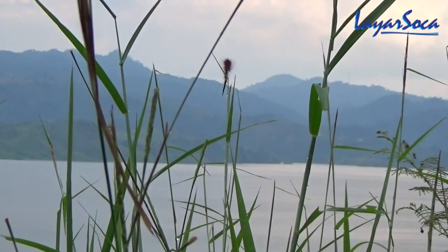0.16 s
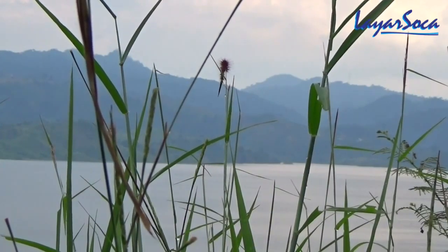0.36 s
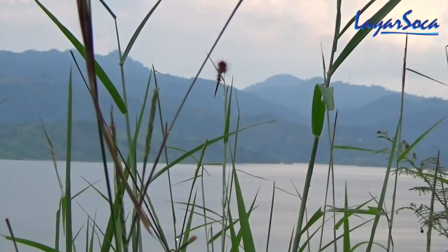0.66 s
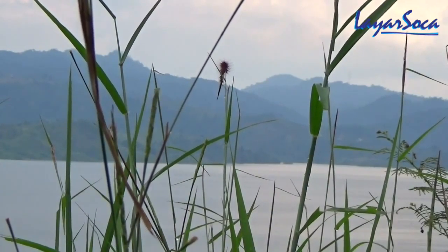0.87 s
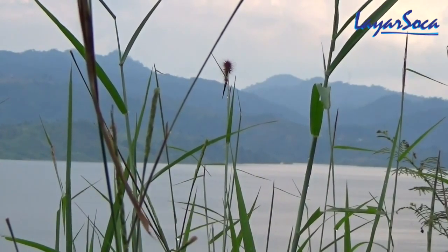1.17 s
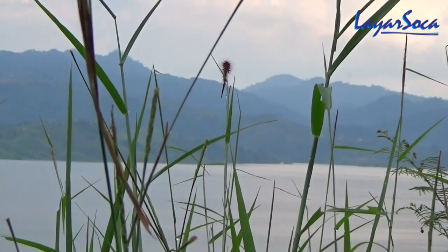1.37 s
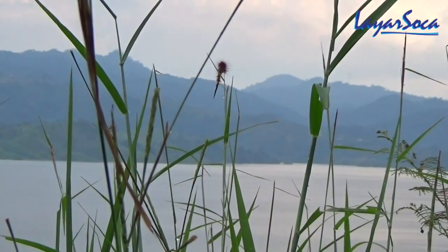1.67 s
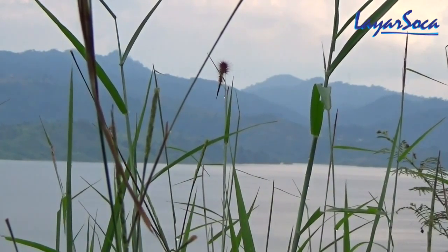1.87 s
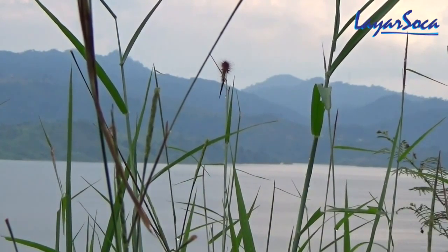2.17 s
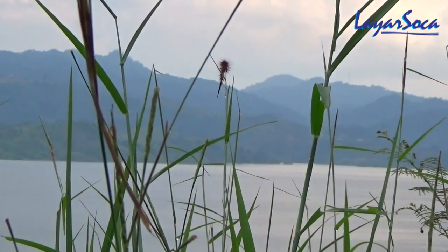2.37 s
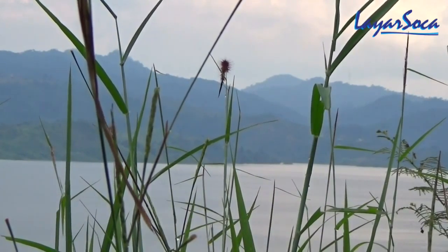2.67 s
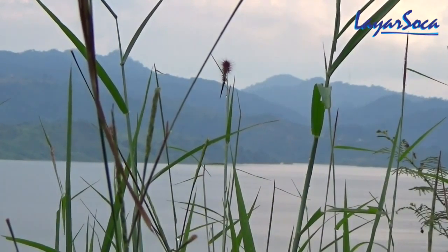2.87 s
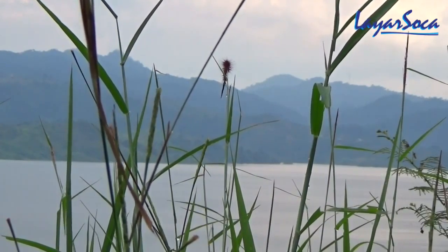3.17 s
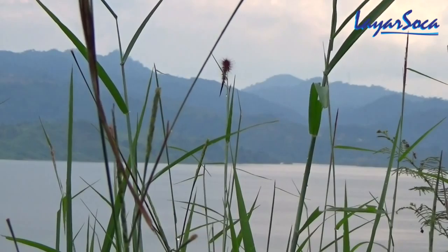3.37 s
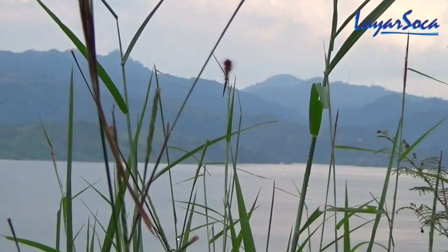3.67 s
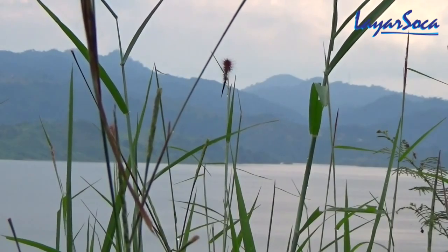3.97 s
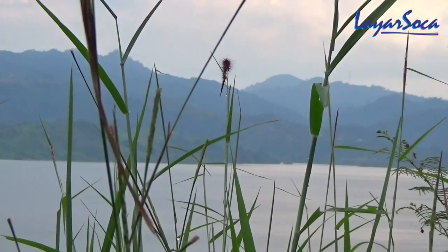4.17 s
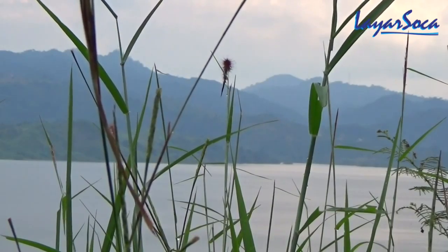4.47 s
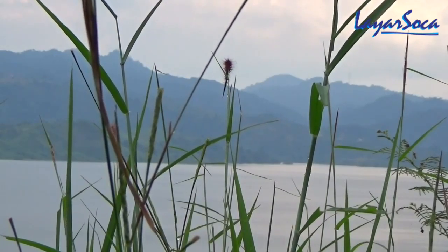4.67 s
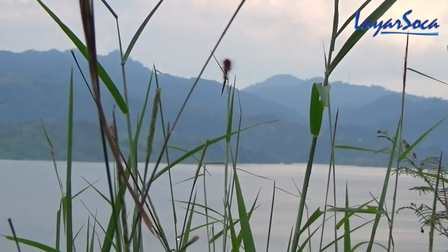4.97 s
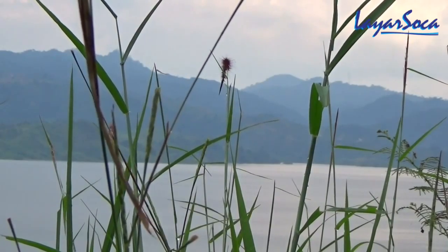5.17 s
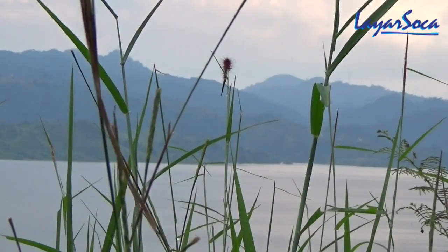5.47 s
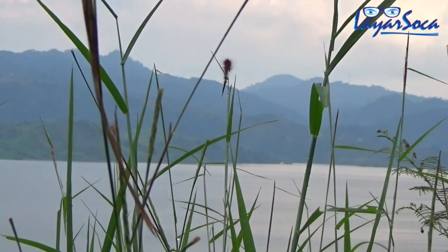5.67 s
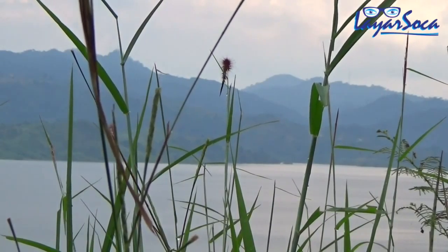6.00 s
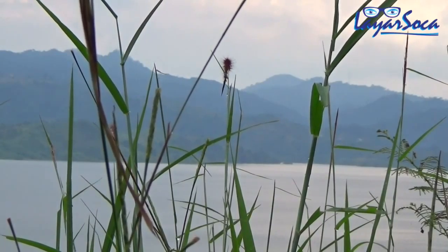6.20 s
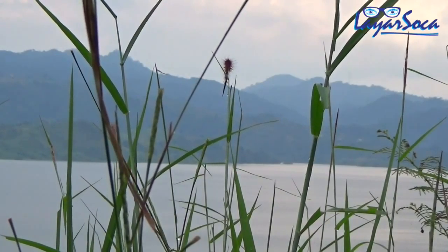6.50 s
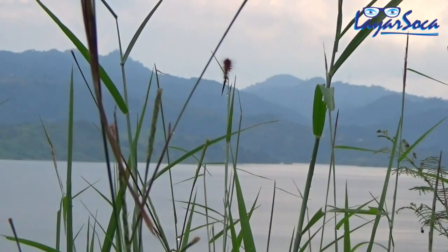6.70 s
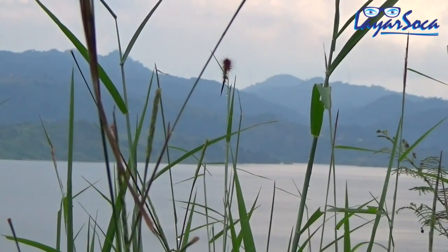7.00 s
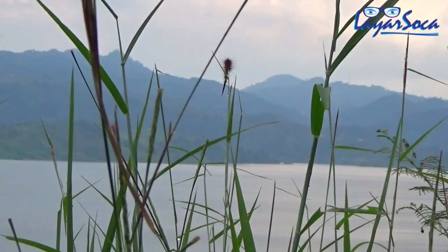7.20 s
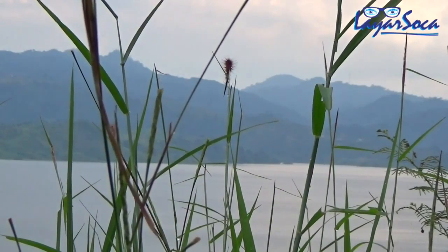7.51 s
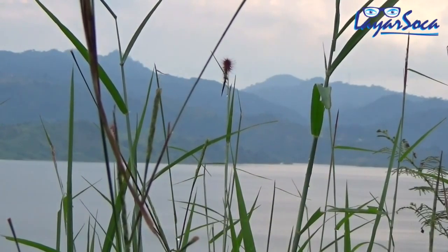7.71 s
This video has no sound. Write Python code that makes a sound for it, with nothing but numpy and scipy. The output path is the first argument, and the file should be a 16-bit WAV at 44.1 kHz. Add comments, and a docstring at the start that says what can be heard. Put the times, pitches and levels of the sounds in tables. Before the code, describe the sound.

Outdoors among lakeside reeds, a close cricket, slightly left, sings short runs of two to six very high, ringing pulses with brief rests. Fainter crickets answer continuously, lower trills and dry rasps throb behind, and distant insects blur into a high hiss. Small birds peep early and whistle downward later. A low distant engine wavers under soft open air. Stereo microphone, quiet and natural.

```python
"""A near cricket sings runs of short, high syllables: a gliding tone that sags as the wings stop, plus its octave.
Farther ones answer, echoing more, and thin bird calls come as short sliding whistles among the reeds.
Trills are pulsed tones and throbbing noise bands; rasps are swelling noise bands; far singers blur into noise.
Underneath: an open-air wash of shaped noise, a distant engine's two wavering sines, breeze puffs, reed ticks."""
import sys
import numpy as np
from scipy import signal
from scipy.fft import rfft, irfft, next_fast_len
from scipy.io import wavfile
from scipy.ndimage import uniform_filter1d

SR = 44100
rng = np.random.default_rng(int(sys.argv[2]) if len(sys.argv) > 2 else 0)


def int16_out(signal):
    """Quantize to a 16-bit WAV file."""
    q = np.round(np.clip(np.atleast_2d(signal).T, -1, 1) * 32767)
    wavfile.write(sys.argv[1], SR, q.astype(np.int16))


N = 346185
TIME_S = np.arange(N) / SR


def amp(db):
    """Decibels to gain."""
    return 10 ** (np.asarray(db) / 20)


def unit(x):
    """Scales to rms 1."""
    return x / np.sqrt(np.mean(x ** 2) + 1e-20)


def read(points, hz):
    """Interpolates a table on a log-frequency axis."""
    f_hz, value = np.transpose(points)
    return np.interp(np.log(hz + 1), np.log(f_hz + 1), value)


def add(mix, start_s, sound):
    """Mixes a sound in at start_s, cut to the ends."""
    start = int(round(start_s * SR))
    sound = sound[max(-start, 0):]
    part = mix[max(start, 0):][:len(sound)]
    part += sound[:len(part)]


def drift(rate_hz):
    """Random wander of rms 1, no faster than about rate_hz; holds its last value if the knots run out."""
    knots = rng.standard_normal(4096)
    return unit(np.interp(TIME_S * 2 * rate_hz, np.arange(len(knots)), knots))


def band(hz, width_hz):
    """Noise in one bell-shaped band, rms 1, partly different at each ear."""
    size = next_fast_len(N)
    f_hz = np.fft.rfftfreq(size, 1 / SR)
    noise = rng.standard_normal((3, size))
    ears = noise[:2] + 1.3 * noise[2]
    bell = 1 / (1 + (2 * (f_hz - hz) / width_hz) ** 4)
    return unit(irfft(rfft(ears) * bell, size)[:, :N])


def pan(x, side_db):
    """Places a sound by its left-minus-right level."""
    return x * amp([[side_db / 2], [-side_db / 2]])


def scatter(x, wet_db, t60_s):
    """Stems and leaves return a short spray of echoes, partly different at each ear."""
    t = np.arange(SR // 3) / SR
    taps = rng.standard_normal((3, len(t))) * amp(-60 * t / t60_s) * (t > .002)
    taps = taps[:2] + taps[2]
    taps *= amp(wet_db) / np.linalg.norm(taps[0])
    taps[:, 0] = 1  # direct sound
    wet = signal.oaconvolve(x[None], taps, axes=1)[:, :N]
    return wet / np.sqrt(1 + amp(wet_db) ** 2)


def swells(rows):
    """Gain curve of bell-shaped swells from rows (middle/s, length/s, level/dB)."""
    t = TIME_S[::64]
    power = 0
    for middle_s, length_s, db in rows:
        fall = np.minimum(2 * (2 * (t - middle_s) / length_s) ** 2, 100)
        power = power + amp(db) ** 2 * np.exp(-fall)
    return np.interp(TIME_S, t, np.sqrt(power))


def bouts(rows):
    """Gain curve that switches softly on and off from rows (start/s, end/s, level/dB)."""
    gain = 0
    for on_s, off_s, db in rows:
        corners_s = [on_s - .04, on_s + .06, off_s - .02, off_s + .02]
        gain = gain + amp(db) * np.interp(TIME_S, corners_s, [0, 1, 1, 0])
    return gain


# one closing stroke: builds, holds, is damped
STROKE_ATTACK_S, STROKE_HOLD_S, DAMPING_DB_PER_S = 0.02093, .011, 3000
# pitch climbs to WING_HZ at TOP_S, then sags ever faster
WING_HZ, TOP_S, CLIMB_HZ_PER_S, SAG_HZ = 7533, .016, 3160, 152
# brief dip in level and pitch late in the stroke
BREAK_S, BREAK_WIDTH_S, BREAK_DB, BREAK_HZ = 0.0295, 0.0011, -17, 227
OCTAVE_S, OCTAVE_WIDTH_S = .0185, 0.0086


def syllable(shift_hz, wobble_hz, overtone_db):
    """The scraper runs along the file and the wing rings; its octave sounds only at the height of the stroke."""
    t = np.arange(SR // 20) / SR
    stop_s = STROKE_ATTACK_S + STROKE_HOLD_S
    knots = rng.standard_normal(size=(2, 16))
    wobble, grip_db = (np.interp(t, np.linspace(0, t[-1], len(row)), row) for row in knots)

    dip = np.exp(-((t - BREAK_S) / BREAK_WIDTH_S) ** 2)
    sag = np.clip((t - TOP_S) / (stop_s - TOP_S), 0, 1.15) ** 3
    hz = WING_HZ + shift_hz - CLIMB_HZ_PER_S * np.maximum(TOP_S - t, 0)
    hz = hz - SAG_HZ * sag - BREAK_HZ * dip + wobble_hz * wobble
    phase = 2 * np.pi * (np.cumsum(hz) / SR + rng.random())

    damping_db = DAMPING_DB_PER_S * np.maximum(t - stop_s, 0)
    level = np.minimum(t / STROKE_ATTACK_S, 1) * amp(grip_db + BREAK_DB * dip - damping_db)
    height = np.exp(-((t - OCTAVE_S) / OCTAVE_WIDTH_S) ** 2)
    ring = np.sqrt(2) * level * np.sin(phase)
    octave = np.sqrt(2) * amp(overtone_db) * height * np.sin(2 * phase)
    return ring, octave


SYLLABLE_GAP_S, FIRST_BEAT_S, RUN_SWELL_DB = .059626, -.001, 0.6
# near cricket's runs, starts snapped to the beat: (t/s, syllables, mid-run level/dB)
CRICKET_RUNS = [(0, 4, -35.5), (.3, 3, -36), (.66, 5, -36.5), (1.01, 4, -34), (1.49, 6, -34.5),
                (1.97, 6, -33.5), (2.56, 4, -35), (2.86, 2, -35.5), (3.04, 4, -36.5), (3.46, 4, -36),
                (3.76, 3, -36), (3.99, 3, -34.5), (4.35, 5, -36), (4.77, 5, -36), (5.13, 4, -34),
                (5.49, 6, -35), (6.02, 5, -35), (6.38, 2, -35.5), (6.56, 4, -35.5), (6.98, 5, -35.5),
                (7.33, 5, -36), (7.75, 2, -36)]


def near_cricket():
    """Wing strokes on a steady beat that carries on through the rests, growing a little through each run."""
    tone, octave = np.zeros((2, N))
    for start_s, syllables, db in CRICKET_RUNS:
        first_beat = round(start_s / SYLLABLE_GAP_S)
        for k, place in enumerate(np.linspace(-.5, .5, round(syllables))):
            ring, overtone = syllable(rng.normal(0, 4), wobble_hz=10, overtone_db=-23.8)
            beat_s = FIRST_BEAT_S + (first_beat + k) * SYLLABLE_GAP_S
            gain = amp(db + RUN_SWELL_DB * place)
            add(tone, beat_s, gain * ring)
            add(octave, beat_s, gain * overtone)
    tone = scatter(tone, wet_db=-14, t60_s=0.17)
    octave = scatter(octave, wet_db=-14, t60_s=.08)
    return pan(tone, side_db=5.5) + pan(octave, side_db=-3)


# farther crickets of the same kind: (pitch shift/Hz, mean level/dB, syllable gap/s, left minus right/dB)
FAR_CRICKETS = [(-90, -44, .0585, 3), (140, -49, .062, -1), (-110, -51, .064, 2), (125, -52, .057, 1)]


def neighbours():
    """Far wings, ring only: each repeats syllables at its own pace and skips one now and then."""
    out = np.zeros((2, N))
    for shift_hz, db, gap_s, side_db in FAR_CRICKETS:
        song, offset = np.zeros(N), rng.random()
        for k, (skip, late, loud, sharp) in enumerate(rng.random((150, 4)) - .5):
            ring, _ = syllable(shift_hz + 40 * sharp, wobble_hz=20, overtone_db=-30)
            gain = (skip > -.32) * amp(db + 4 * loud)
            add(song, (k - offset + .12 * late) * gap_s, gain * ring)
        out += pan(scatter(song, wet_db=-6, t60_s=.15), side_db)
    return out


def whistle(length_s, start_hz, end_hz, db, arch_hz=0):
    """A thin, slightly hoarse note that slides fast at first and levels off, or arches."""
    u = np.linspace(0, 1, max(int(length_s * SR), 2))
    hoarse_hz = 50 * np.interp(u, np.linspace(0, 1, 24), rng.standard_normal(24))
    slide_hz = end_hz + (start_hz - end_hz) * (1 - u) ** 2.6
    hz = slide_hz + arch_hz * np.sin(np.pi * u) + hoarse_hz
    tone = np.sin(2 * np.pi * np.cumsum(hz) / SR)
    return amp(db) * np.sqrt(2) * signal.windows.tukey(len(u), .5) * tone


FIRST_PEEP_S, PEEP_GAP_S, PEEP_COUNT = 0, .338, 7
PEEP_S, PEEP_START_HZ, PEEP_END_HZ, PEEP_DB = 0.028, 6900, 6800, -52
SLIDE_S = 0.043
# sliding bird notes: (t/s, start f/Hz, end f/Hz, level/dB)
SLIDES = [(.336, 5900, 5250, -59), (4.635, 5300, 6000, -59), (5.504, 5200, 3970, -55),
          (5.911, 6000, 3900, -49.5), (6.428, 6000, 5250, -57), (6.519, 4950, 4520, -62),
          (6.57, 4400, 3980, -65), (7.542, 5700, 3950, -56), (7.58, 6450, 6700, -55)]
LOW_NOTE_S, LOW_NOTE_HZ, LOW_ARCH_HZ, LOW_NOTE_DB = 0.0417, 2133, 618, -59
# low arched bird notes: start t/s
LOW_NOTE_STARTS = [5.594, 5.999]


def birds():
    """Whistled regular peeps, scattered slides and low arched notes, all echoing among the reeds."""
    song = np.zeros(N)
    for k in range(PEEP_COUNT):
        peep = whistle(PEEP_S, PEEP_START_HZ, PEEP_END_HZ, PEEP_DB)
        add(song, FIRST_PEEP_S + k * PEEP_GAP_S, peep)
    for start_s, start_hz, end_hz, db in SLIDES:
        add(song, start_s, whistle(SLIDE_S, start_hz, end_hz, db))
    for start_s in LOW_NOTE_STARTS:
        add(song, start_s, whistle(LOW_NOTE_S, LOW_NOTE_HZ, LOW_NOTE_HZ, LOW_NOTE_DB, LOW_ARCH_HZ))
    return scatter(song, wet_db=-2, t60_s=.2)


def trill(level, hz, sweep_hz, rate_hz, duty, rough_hz):
    """An unbroken train of wing strokes, each falling in pitch; uneven teeth roughen the tone."""
    turns = np.cumsum(rate_hz * (1 + .02 * drift(3))) / SR
    stroke = np.minimum(turns % 1 / np.clip(duty, .1, 1), 1)
    pitch_hz = hz + sweep_hz * (.5 - stroke) + rough_hz * drift(300)
    tone = np.sin(2 * np.pi * np.cumsum(pitch_hz) / SR)
    song = unit(np.sin(np.pi * stroke) * tone * amp(1.5 * drift(40)))
    return scatter(song * level, wet_db=-6, t60_s=.07)


# low trill's level course, before the mix trim: (t/s, level/dB)
LOW_TRILL_LEVEL = [(0.05, -66), (0.39, -63.5), (0.74, -58), (1.1, -63.5), (2.44, -60), (3.0, -72),
                   (3.71, -60), (4.96, -59.5), (5.24, -64.5), (6.27, -60), (6.55, -49), (6.74, -63),
                   (7.78, -60.5)]


def low_trills(trim_db=-4.0):
    """Two low crickets trill side by side in a noise-band haze of farther ones."""
    level = amp(np.interp(TIME_S, *np.transpose(LOW_TRILL_LEVEL)))
    steadier = np.sqrt(level * level.mean())  # half the swing in dB
    quick = trill(level, hz=3530, sweep_hz=580, rate_hz=23.6, duty=.7, rough_hz=65)
    slow = trill(steadier, hz=3490, sweep_hz=500, rate_hz=18, duty=.7, rough_hz=90)
    haze = steadier * band(hz=3545, width_hz=490)
    return pan(amp(trim_db) * (quick + amp(-2.5) * slow + haze), side_db=6.5)


# long rasps: each gap a little longer than the last
FIRST_RASP_S, RASP_GAP_S, RASP_SLOWING_S = .075, .326, .001
LONG_RASP_S, LONG_RASP_DB = 0.13, -56.5
SHORT_RASP_S, SHORT_RASP_DB = 0.077, -57
# uneven short rasps: middle t/s
SHORT_RASP_MIDDLES = [0.318, .74, 1.57, 1.7, 1.82, 2.21, 2.35, 2.585, 2.98, 3.29, 3.55, 4.14, 4.5, 4.74,
                      5.17, 5.33, 6.17, 6.53, 6.95]


def rasps(uneven_db=0.6):
    """Toneless bursts of a file scraped over a damped wing; the long ones span a wider band."""
    gaps_s = RASP_GAP_S + RASP_SLOWING_S * np.arange(int(TIME_S[-1] / RASP_GAP_S))
    middles_s = FIRST_RASP_S + np.cumsum(gaps_s) - gaps_s

    def bursts(middles, length_s, db):
        """Swells of slightly uneven level."""
        return swells([(s, length_s, db + uneven_db * rng.standard_normal()) for s in middles])

    long = bursts(middles_s, LONG_RASP_S, LONG_RASP_DB) * band(hz=6325, width_hz=890)
    short = bursts(SHORT_RASP_MIDDLES, SHORT_RASP_S, SHORT_RASP_DB) * band(hz=6350, width_hz=350)
    return (long + short) * amp(1.5 * drift(50))


# steady far singers: (f/Hz, width/Hz, level/dB)
FAR_SINGERS = [(7476, 260, -49.5), (7720, 69, -56), (13480, 90, -82), (10770, 800, -66)]


def whines():
    """Far singers run together into narrow noise bands."""
    return sum(amp(db) * band(hz, width_hz) for hz, width_hz, db in FAR_SINGERS)


# likeness of the two channels: (f/Hz, coherence)
COHERENCE = [(30, 0.96), (130, 0.99), (250, 0.9), (500, 0.37), (1000, .05), (2500, 0.16), (5000, 0.11),
             (10000, 0.86), (15000, 0.5)]


def wash(spectrum, db, patchy_db):
    """Diffuse noise, shaped over frequency, with slowly drifting patches."""
    frames, hz = N // 512 + 5, np.fft.rfftfreq(2048, 1 / SR)
    a, b, c, d, patches = rng.standard_normal((5, frames, len(hz)))
    patches = uniform_filter1d(patches, size=20, axis=0)  # over time
    patches = unit(uniform_filter1d(patches, size=12, axis=1))  # over frequency
    same = np.clip(read(COHERENCE, hz), -1, 1)
    left = a + 1j * b
    right = same * left + np.sqrt(1 - same ** 2) * (c + 1j * d)
    bins = np.array([left, right]) * amp(read(spectrum, hz) + patchy_db * patches)
    noise = signal.istft(bins.transpose(0, 2, 1), nperseg=2048, noverlap=1536)[1][:, :N]
    return amp(db) * unit(noise)


# countless far insects, relative spectrum: (f/Hz, density/dB)
CHORUS_SPECTRUM = [(2700, -55), (3150, 2), (4100, -3.5), (4650, 7.5), (5300, 0.5), (6000, 7), (6700, 5.5),
                   (7100, 0.5), (7950, 5), (8500, 3), (9300, 3), (10800, 0.5), (12500, -1.5), (14400, -2),
                   (15800, -0.5)]


def chorus():
    """Countless far insects blur into high shaped noise."""
    return wash(CHORUS_SPECTRUM, db=-53.5, patchy_db=.4)


# open air, relative spectrum: (f/Hz, density/dB)
AIR_SPECTRUM = [(15, -33), (25, -16), (131, -1.5), (177, 0), (204, -8), (235, -5), (358, -9), (475, -9),
                (803, -13.5), (943, -11), (1230, -15.5), (1760, -18), (3100, -18.5), (4030, -36),
                (6820, -120)]


def open_air():
    """Open-air wash: noise strongest in the low range."""
    return wash(AIR_SPECTRUM, db=-53.7, patchy_db=1)


# engine lines, before carry: (f/Hz, level/dB)
ENGINE_LINES = [(138, -66), (208, -63.5)]
# how well the drone carries across the water: (t/s, gain/dB)
WATER_CARRY = [(0, 5.5), (1.5, 2.5), (2.3, -3.5), (4, 0), (5.5, 0.5), (7.85, -0.5)]


def engine(waver=0.003, fading_db=-1.0):
    """Two low orders, wavering together in pitch, that fade and return across the water."""
    warped_s = np.cumsum(1 + waver * drift(2)) / SR
    lines = 0
    for hz, db in ENGINE_LINES:
        fading = amp(fading_db * drift(3))
        lines = lines + amp(db) * unit(fading * np.sin(2 * np.pi * hz * warped_s))
    return lines * amp(np.interp(TIME_S, *np.transpose(WATER_CARRY)))


def chirr(rows, hz, width_hz, rate_hz):
    """A far trill: distance blurs its strokes into a throbbing band."""
    turns = np.cumsum(rate_hz * (1 + .01 * drift(3))) / SR
    throb = unit(.25 + np.sin(np.pi * turns) ** 4)
    return bouts(rows) * throb * band(hz, width_hz)


# thin trill bouts: (start t/s, end t/s, level/dB)
THIN_BOUTS = [(.1, .52, -64.5), (1.3, 1.8, -65.5), (2.4, 2.94, -65.5), (3.4, 3.95, -68), (4.4, 5.15, -70),
              (5.6, 6.2, -71), (7.1, 7.85, -70)]


def thin_trill():
    """A thin insect chirrs above the low crickets."""
    return pan(chirr(THIN_BOUTS, hz=4980, width_hz=370, rate_hz=22.6), side_db=1)


# fast trill bouts: (start t/s, end t/s, level/dB)
FAST_BOUTS = [(.68, 1.58, -67.5), (3.65, 4.5, -67), (5.28, 6.15, -67), (7.2, 7.9, -68)]


def fast_trill():
    """Another thin insect chirrs higher and faster."""
    return pan(chirr(FAST_BOUTS, hz=5550, width_hz=440, rate_hz=41.2), side_db=-6)


# puffs of breeze: (middle t/s, length/s, level/dB)
BREEZE_PUFFS = [(.87, 0.41, -55), (3.38, 0.19, -60), (3.7, 0.33, -65), (5.8, 0.22, -59)]
# dry reed ticks: (t/s, level before band-pass/dB)
REED_TICKS = [(3.991, -44), (6.79, -44)]


def breeze():
    """Low-band noise puffs, and now and then a dry reed's tick: a decaying noise burst."""
    ticks, t = np.zeros(N), np.arange(SR // 20) / SR
    for start_s, db in REED_TICKS:
        add(ticks, start_s, amp(db) * np.exp(-t / 0.011) * rng.standard_normal(len(t)))
    ticks = signal.lfilter(*signal.butter(1, [1200, 4000], "bandpass", fs=SR), ticks)
    puffs = swells(BREEZE_PUFFS) * unit(band(hz=78, width_hz=70).mean(0))
    return puffs + scatter(ticks, wet_db=-3, t60_s=.12)


def scene():
    """Insects near and far, with birds, the engine and the open air."""
    crickets = near_cricket() + neighbours()
    trills = low_trills() + thin_trill() + fast_trill()
    insects = crickets + trills + rasps() + whines() + chorus()
    return insects + birds() + engine() + breeze() + open_air()


EDGE_HZ = 15800


def record(dry):
    """Band limit: a steep linear-phase low-pass."""
    low_pass = signal.firwin(801, EDGE_HZ, window=("kaiser", 9), fs=SR)
    return signal.oaconvolve(dry, low_pass[None], "same", axes=1)


dry = scene()
out = record(dry)
int16_out(out)
```